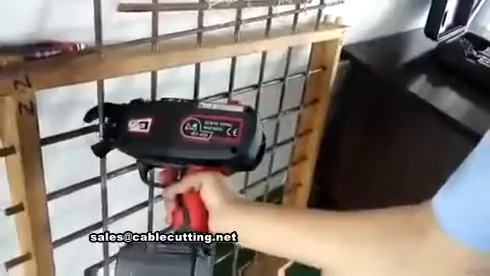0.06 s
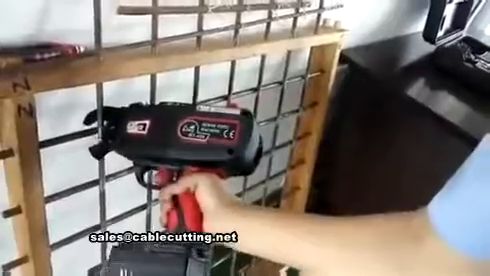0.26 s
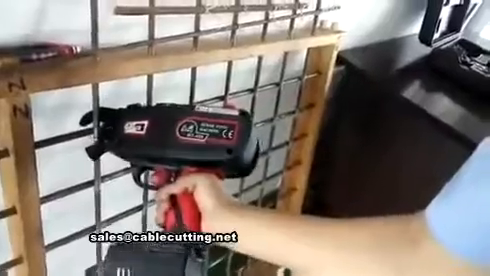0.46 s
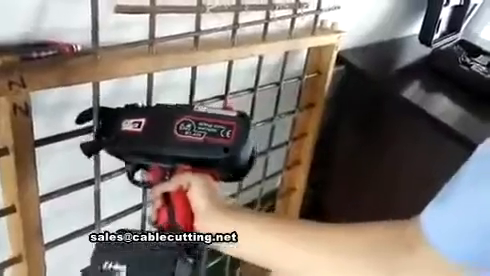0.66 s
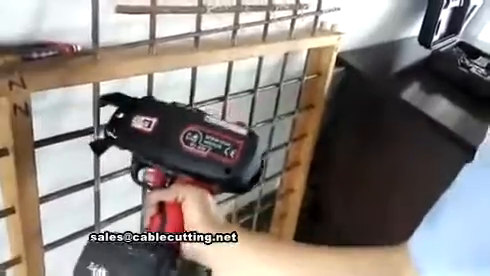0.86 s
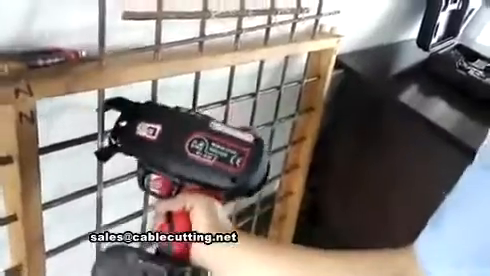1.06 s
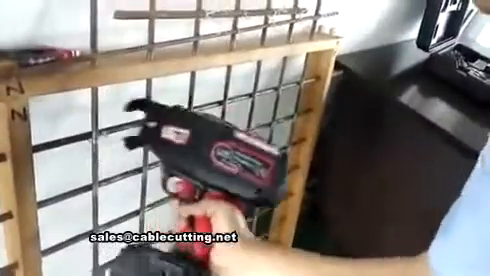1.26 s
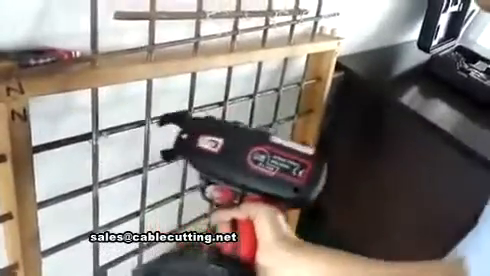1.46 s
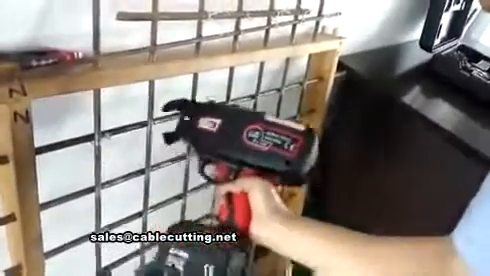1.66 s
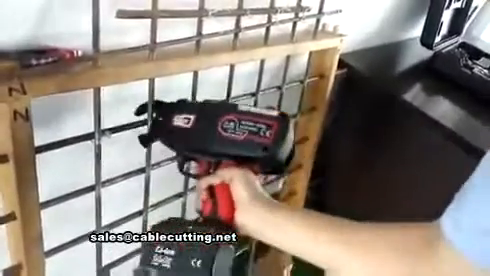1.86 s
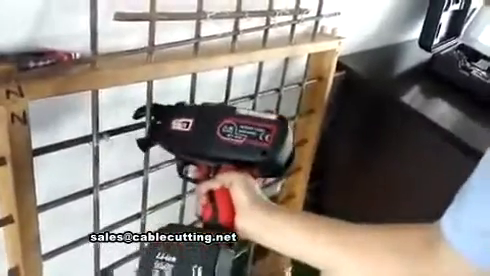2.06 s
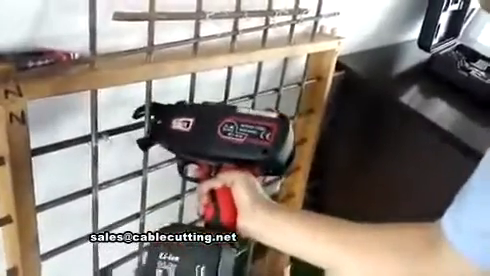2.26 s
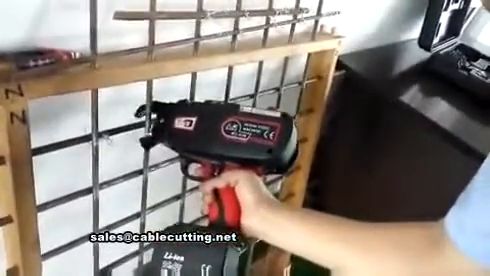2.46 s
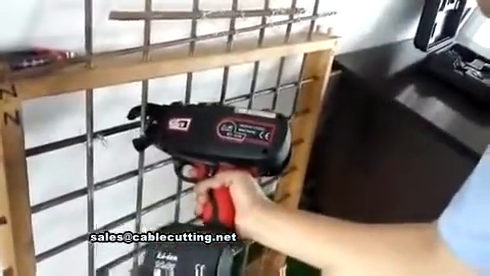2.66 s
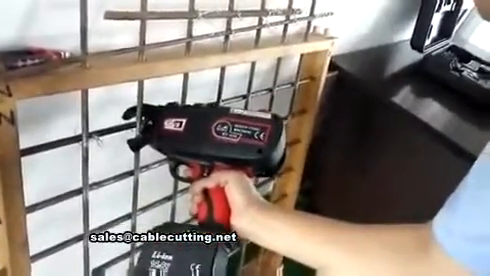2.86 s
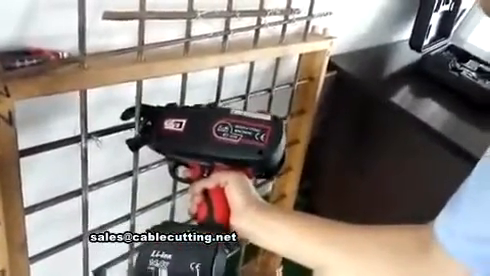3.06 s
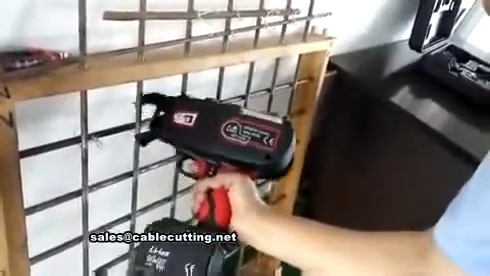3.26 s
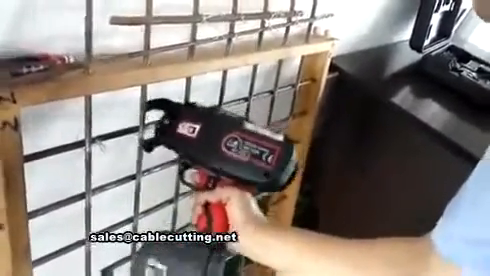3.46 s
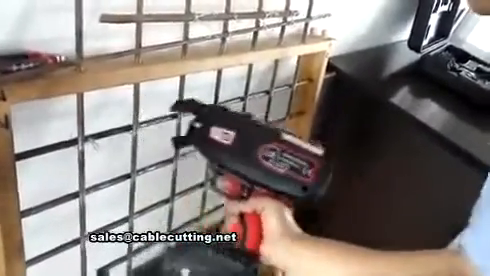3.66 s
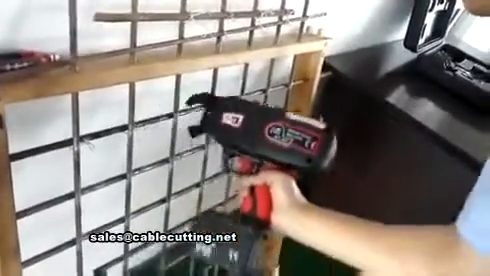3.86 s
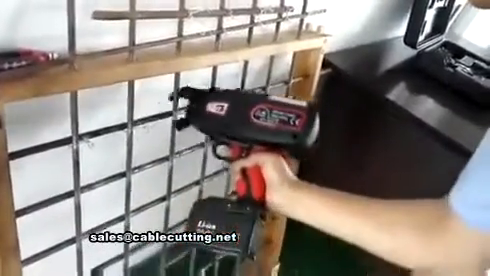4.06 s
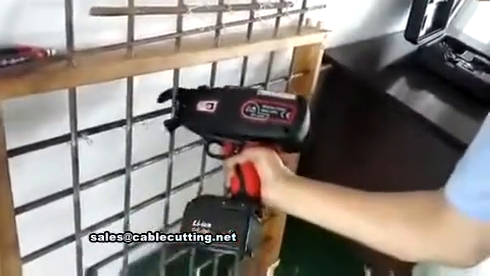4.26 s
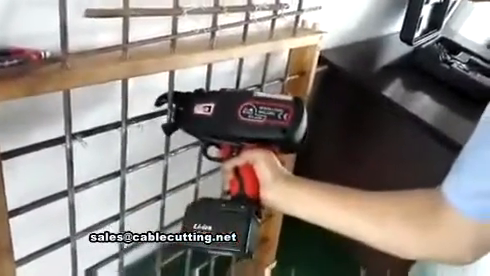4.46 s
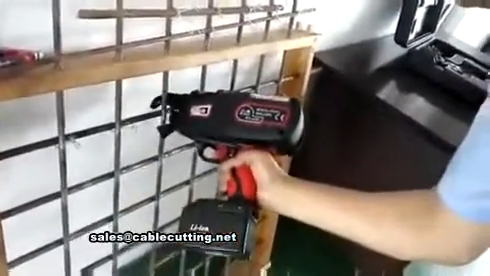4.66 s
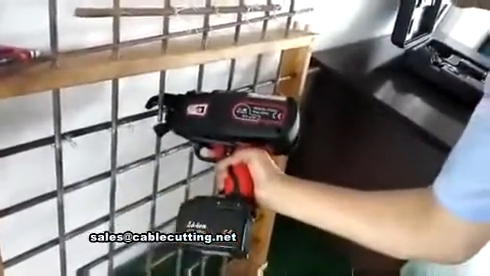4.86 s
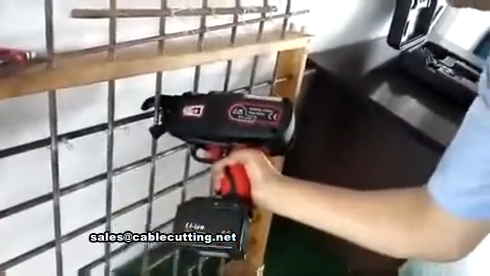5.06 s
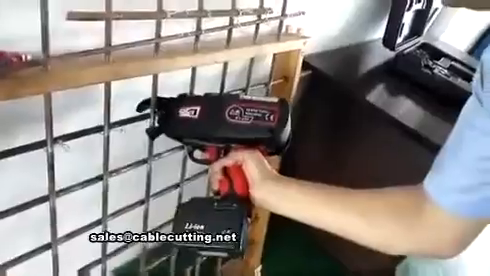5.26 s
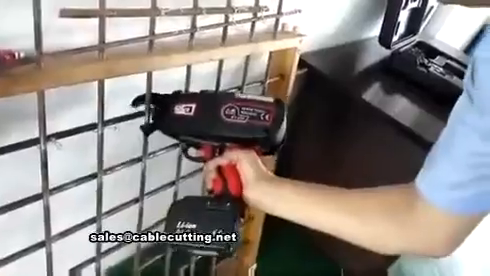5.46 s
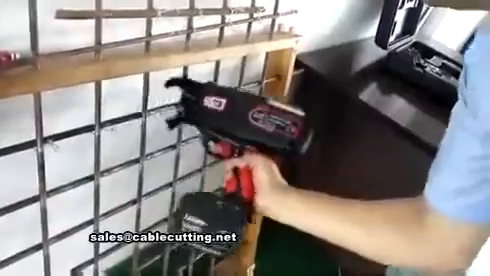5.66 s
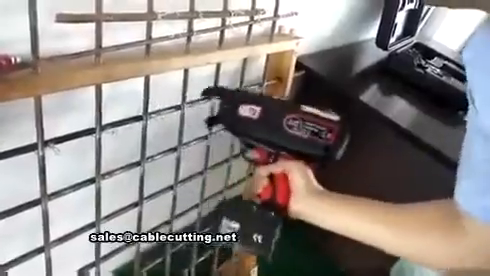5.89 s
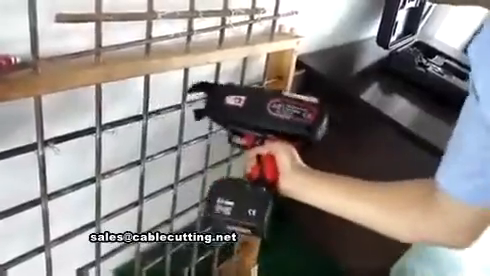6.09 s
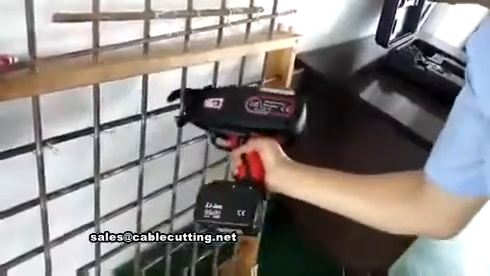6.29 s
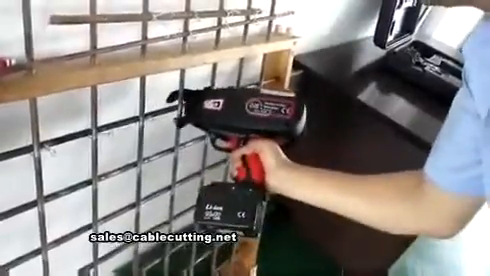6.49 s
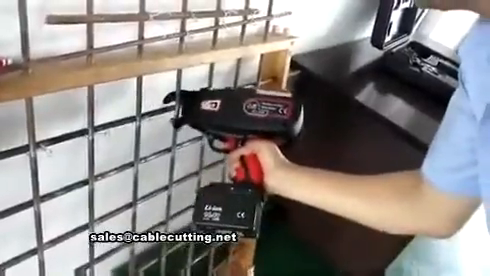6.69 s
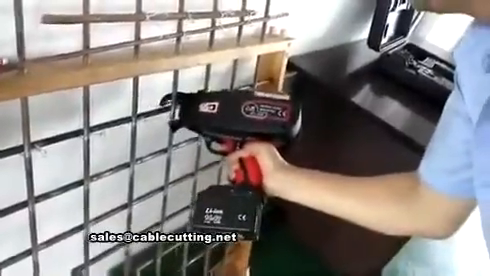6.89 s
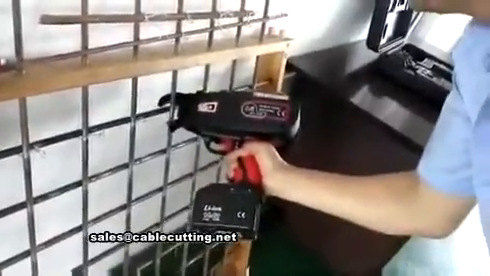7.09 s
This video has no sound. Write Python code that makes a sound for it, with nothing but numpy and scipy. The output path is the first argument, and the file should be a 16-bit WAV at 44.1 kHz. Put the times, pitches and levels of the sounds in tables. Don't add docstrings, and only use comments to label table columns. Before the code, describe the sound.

In a hard, reverberant room with faint hiss and rumble, a close battery wire-tying tool is already twisting: a clack at 0.04 s, then a gritty whine near 1.9 kHz, sagging and growling until 0.73, a run-back and double clack around 0.91. At 1.2-1.35 the jaw knocks steel bars: short hard clangs, rattling chatter and a low wooden thud. At 1.93 the next tie starts with a fast feed whirr and small rising squeals, clunk at 2.26, slower gear grind, snip at 2.41, clack and twist whine from 2.49 to 3.09, louder run-back to 3.32. Bars clatter again at 3.57-3.85, with the strongest frame boom. The third tie runs 4.17-5.64, twisting from 4.73, with a wire snap at 5.39 and end clacks at 5.59. Lighter knocks and a thin wire flick follow at 5.67-5.86. The last tie feeds at 6.33, cuts at 6.80 and begins twisting at 6.87, continuing at the end.

```python
import sys
import numpy as np
from scipy import signal
from scipy.fft import rfft, irfft, next_fast_len
from scipy.io import wavfile
from scipy.ndimage import uniform_filter1d

SR = 44100
rng = np.random.default_rng(int(sys.argv[2]) if len(sys.argv) > 2 else 0)


def dump(signal):
    limited = np.clip(np.atleast_2d(signal).T, -1, 1)
    pcm = np.round(limited * 32767).astype(np.int16)
    wavfile.write(sys.argv[1], SR, pcm)


def amplitude_ratio(level_db):
    exponent = np.asarray(level_db, float) / 20
    return 10 ** exponent


N = 314433
SIZE = next_fast_len(N + SR)
HZ = np.maximum(np.arange(SIZE // 2 + 1) * SR / SIZE, 1)
T = np.arange(N) / SR

# frequency in Hz, level in dB.
AIR_TONE = [(18, -42), (30, -23.5), (111, -13), (217, -15), (393, -19.5), (640, -31), (806, -26.5),
            (2370, -31), (2700, -29), (6150, -39.5), (6810, -32), (7750, -44.5), (8370, -74), (9280, -43.5),
            (14000, -51)]
# frequency in Hz, width in Hz, level in dB.
FRAME_MODES = [(78, 22, -9), (110, 9, 0), (132, 18, -6), (190, 25, -12), (240, 30, -16), (332, 25, -16)]
# start in seconds, level in dB, time to die by 60 dB in seconds.
JOLTS = [(.78, -30, 1.4), (.89, -23, 0.27), (1.22, -17.5, 0.91), (1.31, -21.5, 1.25), (1.45, -29.5, 0.74),
         (1.95, -37, 0.2), (2.48, -37, 0.13), (3.02, -30, 0.39), (3.14, -27, 0.82), (3.57, -11.5, 0.87),
         (3.67, -20, 1.13), (3.94, -24, 0.3), (4.02, -35.5, 2), (5.5, -31.5, 2.8), (5.6, -36, 1.4),
         (5.8, -33, 0.9), (5.92, -36, 0.94), (6.15, -48, 0.31), (6.36, -38, 0.35)]
KNOCK_S = [1.212, 1.232, 1.243, 1.308, 1.319, 1.34, 3.566, 3.58, 3.656, 3.686, 3.739, 3.771, 3.845, 5.665,
           5.756, 5.86]
# peak in dB, level in dB of the chatter it sets off.
KNOCK_FORCE = [(-15, -21), (-1, -9.5), (-24, -22), (0.5, -17.5), (-10.5, -24.5), (-8, -20.5), (-4.5, -11),
               (-6, -10), (-12, -14), (-13, -25), (-7, -31), (-22, -35), (-35, -54), (-32, -25.5),
               (-17, -20), (-22, -23.5)]
# frequency in Hz, level in dB, free ring (60 dB) in seconds.
BAR_MODES = [(1200, 16, 0.99), (1188, -2.5, 0.8), (1617, 11.5, 0.99), (2410, -12, 0.87), (2710, 4, 1.6),
             (2659, -28, 1.9), (3130, -11, .5), (3770, -32, 0.8), (4940, -30, 2.0), (5670, -16, 0.74),
             (5997, -27, 0.78), (7200, -12, 0.4), (6800, 8.5, 0.68)]
# frequency in Hz, level in dB.
CHATTER_TONE = [(180, -38), (300, -2), (580, -2.5), (1220, -3.5), (2030, -8.5), (2670, -11), (3040, -8.5),
                (6680, -15), (7600, -20.5), (8100, -63), (9220, -66), (9670, -26), (14000, -33)]
# start in seconds, peak in dB, length in seconds.
FLICKS = [(2.412, -16, 0.12), (5.784, -16, 0.13), (5.81, -28, 0.11)]
CLACKS = { "latch": ((-9, 0.045), [(1.953, -3), (4.187, -28), (6.364, -10), (6.44, -6.5), (4.2, -7),
          (4.3, 0)]), "guide": ((-10, .07), [(2.26, 0), (4.485, 3), (6.642, -2)]), "cutter": ((2.5, 0.1),
          [(2.409, -2), (4.647, -2.5), (6.801, -4)]), "clutch": ((-0.64, 0.069), [(0.038, 0.5), (2.489, 3),
          (4.729, 1.5), (6.874, 1)]), "wire snap": ((2, 0.019), [(2.872, 4), (5.394, -3)]),
          "end stop": ((0.83, 0.069), [(0.909, -3), (0.919, 1.5), (5.588, -3), (5.598, 2)]),
          "soft stop": ((-24, 0.056), [(0.87, -26), (3.204, -24), (3.305, -6)]), }
# frequency in Hz, level in dB.
CLACK_TONE = [(120, -38), (200, -8), (571, -6), (1460, 0.5), (2240, -8), (3320, -8), (6400, -10),
              (7650, -16), (8070, -56), (9810, -19.5), (14000, -22.5)]
# trigger pulled, twist engages, wire tight, run-back stops, all in seconds.
TIES = [
    (-.522, .038, .728, .95),
    (1.928, 2.489, 3.088, 3.322),
    (4.171, 4.727, 5.41, 5.635),
    (6.329, 6.874, 7.55, 7.77),
]
# feed, shift, twist, run-back and squeal levels, all in dB.
EFFORT = [
    (0.1, 2, 0.43, 1.5, 0.1),
    (0.55, 2, 0.4, 4.5, -5),
    (0, 0.5, .5, 0, -1.5),
    (-0.5, 0.5, -.5, 0.1, -7),
]
# start and end in seconds after trigger, from Hz, to Hz, level in dB.
SQUEALS = [
    (.01, .07, 3200, 2850, -33),
    (.075, .275, 2730, 3480, -29),
    (.085, .25, 1420, 1700, -22),
    (.428, .484, 2165, 1990, -27),
]
# time in seconds after trigger, level in dB, brightness in dB.
FEED_RUN = [
    (-.006, -44, 15),
    (0.01, -16.5, -3),
    (.03, -13.5, -6),
    (.065, -19, 0),
    (.14, -15.5, -3.5),
    (.2, -17, 1.5),
    (.272, -20, 3),
    (.286, -42, -7),
]
# frequency in Hz, level in dB.
FEED_TONE = [(180, -31), (560, -22), (800, -5.5), (1000, -11.5), (1250, -10), (1450, 0.5), (1640, 2),
             (1800, -12.5), (2300, -13.5), (2900, -11.5), (3400, -14), (4330, -13.5), (7000, -19.5),
             (14000, -36)]
# frequency in Hz, level in dB.
SHIFT_TONE = [(180, -57), (300, -14), (660, -16.5), (787, -2.5), (1020, -11), (1380, 3.5), (1820, -7.5),
              (2070, -4.5), (2630, -8), (6900, -16.5), (8500, -52), (9670, -27.5), (14000, -33)]
# frequency in Hz, level in dB.
BACK_TONE = [(180, -62), (300, -17.5), (649, -13.5), (787, -3.5), (1020, -11.5), (1360, -1.5), (1880, -6.5),
             (7010, -20.5), (7720, -28.5), (8370, -87), (9220, -23), (9830, -28), (14000, -36.5)]
# frequency in Hz, level in dB.
TWIST_TONE = [(180, -47), (300, -19), (520, -14), (650, -16), (790, -8), (1020, -10.5), (1350, -1.5),
              (1630, -0.5), (1800, -3.5), (2550, -11), (3290, -5.5), (6580, -13.5), (8500, -20),
              (14000, -22.5)]
# frequency in Hz, likeness from -1 to 1.
PORT_LIKENESS = [(60, 1), (100, 1), (180, 1), (310, 0.99), (540, 0.42), (930, 0.17), (1620, 0.25),
                 (2800, 0.034), (4850, 0.018), (8390, 0.053), (14500, 0.34)]
# frequency in Hz, left over right in dB.
PORT_TILT = [(60, 0.2), (92, 1.2), (140, -2.5), (210, -0.5), (320, -1.5), (500, 0.5), (760, -5), (1150, 2),
             (1760, -4.5), (2680, -0.5), (4090, -2.5), (6240, -6.5), (9530, -3.5), (14500, -2.5)]
STRIPED_SPANS = [(1.27, 1.46), (3.6, 3.86)]
GAP_FILLED_S = [.05, .25, .42, .47, .92, 2.51, 2.54, 3.58, 4.3, 4.65, 5.6, 6.88]

HOUSING_HZ, HOUSING_WIDTH_HZ = 1575, 210


def rms_one(x):
    return x / np.sqrt(np.mean(x ** 2) + 1e-20)


def at_hz(points):
    hz, value = np.array(points).T
    return np.interp(np.log(HZ), np.log(hz), value)


def colour(x, spectrum):
    tone_db = at_hz(spectrum)
    cepstrum = irfft(tone_db * np.log(10) / 20, SIZE)
    cepstrum[1:SIZE // 2] *= 2
    cepstrum[SIZE // 2 + 1:] = 0
    response = np.exp(rfft(cepstrum)) / np.sqrt(np.mean(amplitude_ratio(2 * tone_db)))
    return irfft(rfft(x, SIZE) * response, SIZE)[..., :N]


def resonate(x, hz, width_hz):
    r = np.exp(-np.pi * width_hz / SR)
    poles = [1, -2 * r * np.cos(2 * np.pi * hz / SR), r * r]
    return signal.lfilter([(1 - r * r) / 2, 0, (r * r - 1) / 2], poles, x)


def brighten(x, db):
    high = signal.sosfilt(signal.butter(1, 2000, "high", fs=SR, output="sos"), x)
    return x + (amplitude_ratio(db) - 1) * high


def drift(rate):
    r = np.exp(-2 * np.pi * rate / SR)
    return rms_one(signal.lfilter([1], [1, -2 * r, r * r], rng.standard_normal(N + SR))[SR:])


def grains(per_s, spread_db):
    size = amplitude_ratio(spread_db * np.minimum(rng.exponential(1, N), 4))
    return size * (rng.random(N) < per_s / SR) * rng.standard_normal((2, N))


def bursts(rows, trim_db, rise_s):
    push = np.zeros(N)
    for s, peak_db, length_s in rows:
        i = int(s * SR)
        age = T[:min(N - i, SR)]
        fall_db = 60 * age / max(length_s, .005)
        push[i:i + len(age)] += amplitude_ratio(peak_db + trim_db - fall_db) * np.minimum(age / rise_s, 1)
    return push


def spans(tables, fade_s=.006):
    s, *columns = np.concatenate(tables).T
    gate = 0
    for t in tables:
        inside_s = np.minimum(T - t[0][0], t[-1][0] - T)
        gate = gate + np.clip(inside_s / fade_s + .5, 0, 1)
    return gate, *[np.interp(T, s, c) for c in columns]


def per_tie(shape, effort_db, dulls=0):
    return [np.array(shape(*tie)) + [0, db, -dulls * db] for tie, db in zip(TIES, effort_db)]


def room_air():
    return amplitude_ratio(-31.5 - 6.5) * rms_one(colour(rng.standard_normal((2, N)), AIR_TONE))


def room(x):
    age = T[:SR - 1]
    tail = rng.standard_normal((2, len(age))) * amplitude_ratio(-60 * age / 0.94) * np.clip(age / 0.0018, 0, 1)
    dull = signal.lfilter([.3], [1, -.7], tail)
    tail = dull + (tail - dull) * amplitude_ratio(-25 * age)
    tail /= np.sqrt(np.sum(tail ** 2, axis=1, keepdims=True))
    return amplitude_ratio(-5) * irfft(rfft(x, SIZE) * rfft(tail, SIZE), SIZE)[:, :N]


def wooden_frame():
    shake = rng.standard_normal((2, N))
    boom = np.zeros((2, N))
    for k, (hz, width_hz, db) in enumerate(FRAME_MODES):
        boom += amplitude_ratio(db) * resonate(shake, hz, width_hz) * (-1) ** k
    boom = signal.sosfilt(signal.butter(2, [58, 430], "band", fs=SR, output="sos"), boom)
    boom /= np.sqrt(uniform_filter1d(boom ** 2, size=3000) + 0.17 * np.mean(boom ** 2))
    return rms_one(boom) * (amplitude_ratio(-50) + bursts(JOLTS, trim_db=-3.0, rise_s=0.01))


def rail():
    return np.sin(2 * np.pi * 332 * T) * bursts([(1.229, -13, .2)], trim_db=-3.5, rise_s=0.0065)


def steel_mesh():
    peak_db, chatter_db = np.transpose(KNOCK_FORCE)
    quick = [(s, db, .14) for s, db in zip(KNOCK_S, chatter_db)]
    slow = [(s, db, 0.73) for s, db in zip(KNOCK_S, chatter_db)]
    shake = bursts(quick, trim_db=-0.5, rise_s=.006) + bursts(slow, trim_db=-10.5, rise_s=0.0076)
    bright_db = 0.27 * (20 * np.log10(shake + 1e-3) + 20)
    crack = bursts([(s, db, .05) for s, db in zip(KNOCK_S, peak_db)], trim_db=-22.5, rise_s=0.0025)
    grit = rms_one(grains(6000, spread_db=2.0) * amplitude_ratio(3.0 * drift(25)))
    out = brighten(colour(grit * (shake * amplitude_ratio(-7) + crack), CHATTER_TONE), bright_db)
    at = [int(s * SR) for s in KNOCK_S]
    for hz, mode_db, t60 in BAR_MODES:
        hits = np.zeros((2, N))
        hits[:, at] = amplitude_ratio(peak_db - 21) * rng.uniform(-1, 1, (len(at), 2)).T
        held_s = min(.09 * t60, .07)
        r, w = amplitude_ratio(-60 / (held_s * SR)), 2 * np.pi * hz / SR
        out += signal.lfilter([0, amplitude_ratio(mode_db) * np.sin(w)], [1, -2 * r * np.cos(w), r * r], hits + 1e-18)
    return out


def wire_flicks():
    high = signal.butter(2, 5000, "high", fs=SR, output="sos")
    hiss = signal.sosfilt(high, rng.standard_normal((2, N)))
    return hiss * bursts(FLICKS, trim_db=-10.5, rise_s=0.0054)


def clacks():
    rows = np.array(sorted((s, db, *part) for part, hits in CLACKS.values() for s, db in hits))
    latest = np.maximum(np.searchsorted(rows[:, 0], T) - 1, 0)
    tilt_db = rows[latest, 2].clip(-9, 3)
    push = bursts(rows[:, [0, 1, 3]], trim_db=-10.0, rise_s=0.0059)
    return brighten(colour(rng.standard_normal((2, N)) * push, CLACK_TONE), tilt_db)


def squeals():
    out, wobble, flutter = np.zeros((2, N)), 1.0 * drift(70), amplitude_ratio(3.0 * drift(40))
    glides = []
    for tie, effort in zip(TIES[1:], EFFORT[1:]):
        glides += [np.add(row, [tie[0], tie[0], 0, 0, effort[4]]) for row in SQUEALS]
    for start, end, from_hz, to_hz, level_db in glides:
        part = slice(int(start * SR), int(end * SR))
        along = np.clip((T[part] - start) / (end - start), 0, 1)
        phase = 2 * np.pi * np.cumsum(from_hz + (to_hz - from_hz) * along ** 1.4) / SR + wobble[part]
        phase += .8 * np.sin(2 * np.pi * 100 * T[part])
        swell = amplitude_ratio(level_db) * np.abs(np.sin(np.pi * along)) ** 0.4
        out[:, part] += swell * flutter[part] * [np.sin(phase), np.cos(phase)]
    return out + amplitude_ratio(9.5) * resonate(out, HOUSING_HZ, HOUSING_WIDTH_HZ)


def gears(tables, tone, turn_hz, throb_db, flicker_db, trim_db):
    gate, level_db, bright_db = spans(tables)
    turn = 2 * np.pi * np.cumsum(turn_hz * amplitude_ratio(.4 * drift(6))) / SR
    rattle = grains(14000, spread_db=0.3) * amplitude_ratio(throb_db * np.cos(turn) + flicker_db * drift(28))
    return brighten(rms_one(colour(rattle, tone)), bright_db) * gate * amplitude_ratio(level_db + trim_db)


def feed_shape(trigger, engage, tight, stop):
    return np.array(FEED_RUN) + [trigger, 0, 0]


def shift_shape(trigger, engage, tight, stop):
    return [(trigger + .283, -23.5, 0), (engage - .135, -25.5, 0), (engage - .073, -16, 0),
            (engage - .055, -24, 0), (engage, -16.5, 0)]


def back_shape(trigger, engage, tight, stop):
    return [(tight, -24, 2.8), (stop - 0.039, -20, -.5), (stop, -24, 5)]


def feed_motor():
    return gears(per_tie(feed_shape, np.array(EFFORT)[:, 0]), FEED_TONE,
                 turn_hz=100, throb_db=2.5, flicker_db=-0.5, trim_db=-0.33)


def jaw_shift():
    return gears(per_tie(shift_shape, np.array(EFFORT)[:, 1]), SHIFT_TONE,
                 turn_hz=61.0, throb_db=1.2, flicker_db=2.0, trim_db=-1.0)


def run_back():
    return gears(per_tie(back_shape, np.array(EFFORT)[:, 3], dulls=0.56), BACK_TONE,
                 turn_hz=58, throb_db=1.2, flicker_db=1.8, trim_db=-1.5)


def twist_shape(trigger, engage, tight, stop):
    rattle_db, rattle_tight_db, whine_free_db = -14.8, -16, -20
    return [(engage, rattle_db, -13), (engage + .035, rattle_db, whine_free_db),
            (engage + .43, rattle_db, whine_free_db), (tight - .1, rattle_tight_db, -25),
            (tight, rattle_tight_db, -9.5)]


def twist_speed():
    free_hz, tight_hz, load_after_s = 1914, 1630, .29
    _, engage, tight, _ = np.array(TIES)[np.searchsorted(np.array(TIES)[1:, 0], T)].T
    age = np.maximum(T - engage, 0)
    load = np.clip((age - load_after_s) / (tight - engage - load_after_s), 0, 1) ** 1.7
    wobble_hz = 105 * np.exp(-age / .055) * np.cos(2 * np.pi * age / .105)
    return free_hz + wobble_hz - (free_hz - tight_hz) * load


def twist_motor():
    teeth_per_turn, armature_order = 32, 4
    panel_hz, panel_width_hz = 1900, 90
    gate, rattle_db, whine_db = spans(per_tie(twist_shape, np.array(EFFORT)[:, 2]))
    mesh_hz = twist_speed()
    turn = 2 * np.pi * np.cumsum(mesh_hz) / SR / teeth_per_turn
    off = np.abs(mesh_hz - panel_hz) / panel_width_hz
    beat_db = 2.8 * np.cos(turn) + 1.2 * np.cos(3 * turn + 1) + 1.5 * np.cos(armature_order * turn + 2)
    rattle = grains(14000, spread_db=-1.1) * amplitude_ratio(beat_db + 1.0 * drift(19))
    rattle = rms_one(colour(rattle, TWIST_TONE)) * amplitude_ratio(rattle_db - 1.31)
    rattle += amplitude_ratio(-9) * off * resonate(rattle, HOUSING_HZ, HOUSING_WIDTH_HZ)
    mesh = teeth_per_turn * turn + (.14 + .55 * off) * drift(40) + .25 * np.sin(turn)
    whine = np.array([np.sin(mesh), np.cos(mesh)]) + amplitude_ratio(-32.0) * np.sin(2 * mesh)
    whine += amplitude_ratio(-16) * np.sin(9 * turn + 1.5 * drift(25))
    whine += amplitude_ratio(-8) * np.sin(27 * turn + 1.1 * drift(30))
    return gate * (rattle + whine * amplitude_ratio(whine_db - 2.0 * off + 1.5 * drift(22)))


def two_ports(draws):
    one, other = rfft(draws, SIZE)
    bounce = np.exp(2.4j * np.sin(2 * np.pi * HZ * .0004))
    other = .35 * one * bounce + .93 * other
    alike, half = np.clip(at_hz(PORT_LIKENESS), -1, 1), amplitude_ratio(at_hz(PORT_TILT) / 2)
    right = alike * one + np.sqrt(1 - alike ** 2) * other
    apart = np.sqrt(2 / (1 + alike))
    return irfft(np.array([one * half, right / half]) * apart, SIZE)[:, :N]


def scene():
    tool = feed_motor() + jaw_shift() + run_back() + twist_motor() + squeals() + clacks()
    near = tool + wire_flicks() + steel_mesh() + rail()
    return two_ports(near + room(near) + wooden_frame() + room_air())


def patchy_treble(x):
    gap_low_hz, gap_high_hz, top_hz = 7650, 9350, 14300
    hz, s, cells = signal.stft(x, SR, nperseg=1024)
    hz = hz[:, None]
    top = (hz > gap_high_hz) & (hz < top_hz)
    patch = rng.standard_normal((len(hz) // 3, len(s) // 2 + 1))
    patch = np.kron(patch, np.ones((3, 2)))[:, :len(s)]
    dropped = patch < -2.2 + 1.5 * (hz - gap_high_hz) / (top_hz - gap_high_hz)
    in_span = sum((s > a) & (s < b) for a, b in STRIPED_SPANS) > 0
    stripes = np.cos(2 * np.pi * (hz - 10230) / 915)
    striped = in_span & (stripes > .3 + .4 * patch) & (hz > 9800)
    near_fill = np.min(np.abs(s - np.array(GAP_FILLED_S)[:, None]), axis=0) < .013
    filled = near_fill & (hz > 8250) & (hz < 9000) & (patch > -.4)
    edge = hz < gap_low_hz + 130 * patch[0]
    gain = edge + top * ~dropped * ~striped * amplitude_ratio(3.5 * patch) + filled * amplitude_ratio(-5.0)
    return signal.istft(cells * gain, SR, nperseg=1024)[1][:, :N]


def top_cut(x):
    return signal.sosfilt(signal.butter(12, 15130, fs=SR, output="sos"), x)


def record(dry):
    mix = patchy_treble(.9 * np.tanh(dry / .9))
    return top_cut(np.clip(mix, -.9, .9))


dry = scene()
out = record(dry)
dump(out)
```